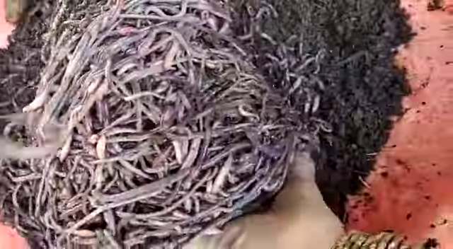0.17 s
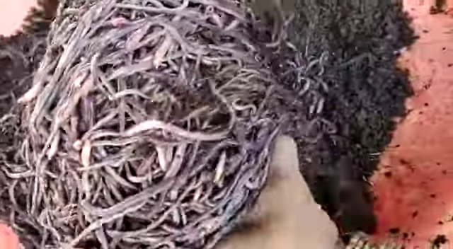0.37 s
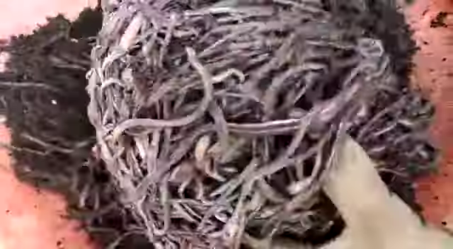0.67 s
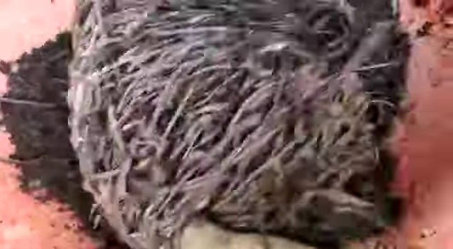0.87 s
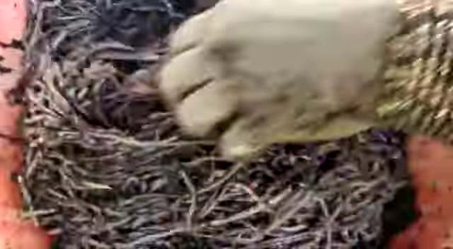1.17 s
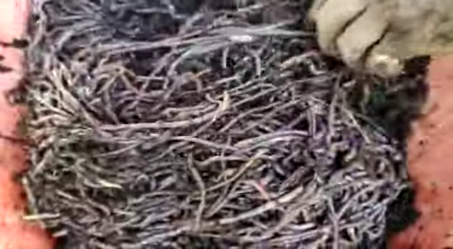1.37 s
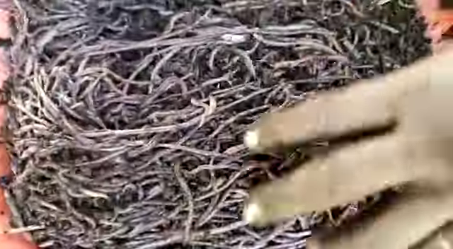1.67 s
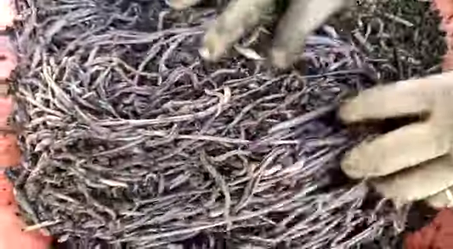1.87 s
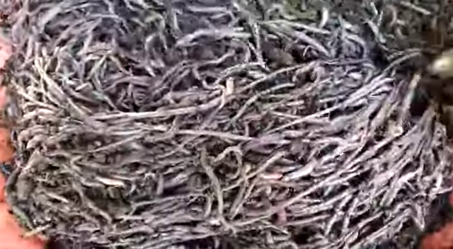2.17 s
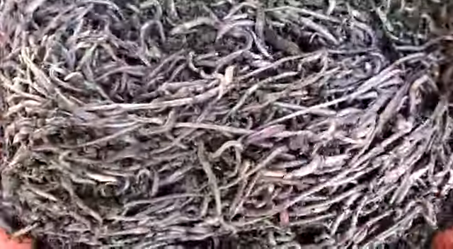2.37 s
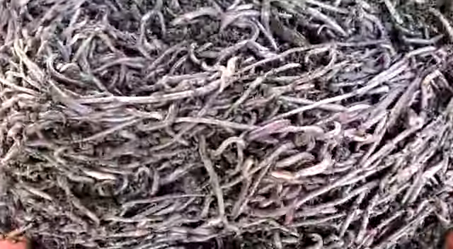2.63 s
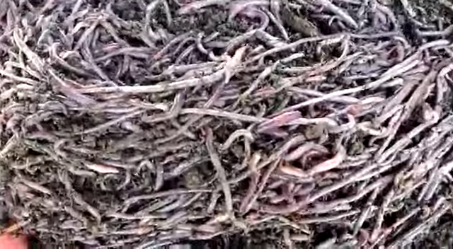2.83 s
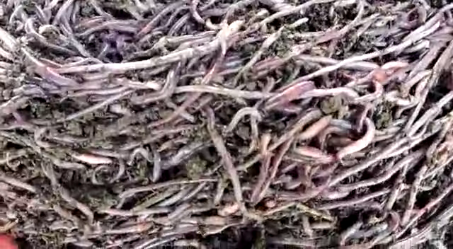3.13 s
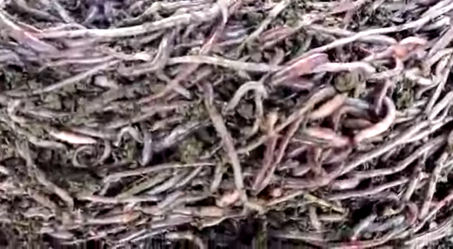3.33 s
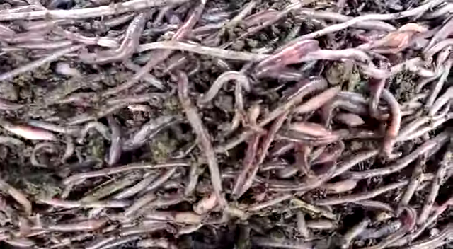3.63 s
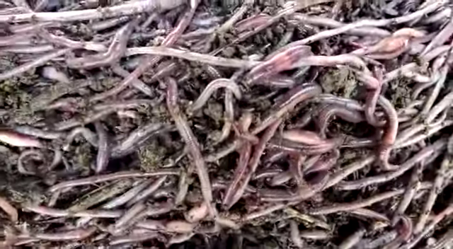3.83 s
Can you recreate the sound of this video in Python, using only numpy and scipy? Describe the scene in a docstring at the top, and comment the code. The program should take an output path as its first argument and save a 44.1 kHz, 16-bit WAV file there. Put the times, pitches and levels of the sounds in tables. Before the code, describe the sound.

Close-miked outdoor handling of earthworms and soil; loud stick-slip rumble with dull knocks first, then much quieter clinking bangles, a soft pat past midway, moist crackles, and faint birds and insects at left.

```python
"""Outdoors, close to the microphone, a hand turns over earthworms and damp soil in a plastic tub.
First a noisy rubbing rumble with damped-sine knocks, which stops abruptly; ringing bangles clink near its end.
Then more clinks, finger brushing and crumb crackle in shaped noise; the clump is patted down past mid-way.
From the trees to the left come gliding-tone trills from the start, then chip-built rasps, slurred whistles
and thin calls of narrow noise, over faint insect whines and a bed of air noise."""
import sys
import numpy as np
from scipy import signal
from scipy.fft import rfft, irfft, next_fast_len
from scipy.io import wavfile
from scipy.ndimage import uniform_filter1d, map_coordinates

SR = 44100
rng = np.random.default_rng(int(sys.argv[2]) if len(sys.argv) > 2 else 0)


def dump_mix(stems):
    """Bounce the given channels to the path in sys.argv[1] as a 16-bit WAV at rate SR."""
    frames = np.atleast_2d(stems).T  # one column per channel
    limited = np.clip(frames, -1, 1)  # hard clip at full scale
    pcm = np.round(limited * 32767).astype(np.int16)
    wavfile.write(sys.argv[1], SR, pcm)


N = 176400

# All levels are relative: each source is trimmed where it is mixed. Left-right/dB is positive to the left.
# close rubbing, course of the rumble: t/s, level/dB
RUMBLE_LEVEL = [(0, -46.5), (.03, -45.5), (.045, -38), (.11, -37), (.128, -43), (.148, -35.5), (.175, -37),
                (.24, -42.5), (.3, -48), (.36, -50.5), (.395, -43.5), (.425, -49.5), (.47, -45),
                (.52, -44.5), (.57, -46), (.605, -40), (.66, -48), (.72, -44), (.765, -40.5), (.79, -45.5),
                (.82, -38.5), (.838, -59), (.87, -45.5), (.9, -34.5)]
# spectrum of the rumble: f/Hz, level/dB
RUMBLE_COLOUR = [(24, -74.5), (40, -41.5), (246, -9), (293, -9.5), (399, -2.5), (732, -4), (870, -8.5),
                 (999, -9), (1710, -26), (2500, -26.5), (3250, -42.5), (5500, -120)]
# hollow resonances that the rubbing excites: f/Hz, width/Hz, level over the broad rumble/dB
HOLLOW_MODES = [(667, 20, 2), (757, 34, 5), (987, 35, 4.5)]
# course of the hiss of the same rubbing: t/s, level/dB
HISS_LEVEL = [(0, -53.5), (.04, -63), (.11, -52.5), (.19, -53), (.23, -51), (.32, -56), (.43, -58.5),
              (.52, -56), (.62, -52.5), (.72, -54), (.8, -58), (.87, -58.5), (.94, -65.5)]
# spectrum of the hiss: f/Hz, level/dB
HISS_COLOUR = [(710, -30), (1200, -1.5), (1710, -7), (2680, -8.5), (3180, -12.5), (4380, -11.5),
               (4830, -16.5), (6730, -5.5), (9990, -17), (15500, -22)]
CRACKLE_RATE, CRACKLE_DB = 36, 3.5  # mean tiny snaps a second in the rubbing, nominal level over its hiss/dB
PORT_LAG_S = 0.00012  # a near sound reaches the right port this much earlier
# soft knocks: t/s, peak level/dB, f/Hz, t60/s
KNOCKS = [(.042, -36, 600, 0.025), (.145, -30, 650, 0.032), (.1808, -22, 760, 0.019),
          (.366, -29.5, 520, 0.0073), (.482, -35.5, 577, .015), (.541, -34.5, 620, 0.026),
          (.729, -34, 480, 0.0042), (.7522, -24.5, 740, 0.0078), (.8, -32.5, 600, 0.044),
          (.811, -26.5, 660, 0.049), (.855, -38, 644, .02), (.878, -20.5, 700, 0.013),
          (.8956, -22, 660, 0.0089), (2.226, -34.5, 280, 0.013), (2.2265, -36.5, 710, 0.019),
          (2.82, -42, 350, 0.0074)]
# snaps of soil crumbs: t/s, level/dB, left-right/dB
CRUMB_SNAPS = [(0.214, -43, -10.5), (0.441, -28, -3), (.696, -21.5, 3.5), (1.529, -34, 0),
               (1.903, -51, -4.5), (2.314, -45.5, 18), (2.672, -47, 16), (2.713, -46.5, 21.5),
               (2.813, -50.5, 12), (2.967, -47, 22)]
# low rustle of soil shifting under the hand: t/s, level/dB
SOIL_LEVEL = [(2.2, -92), (2.235, -64), (2.3, -72), (2.5, -74), (2.7, -68), (2.81, -60), (2.89, -63),
              (3.05, -77), (3.15, -92)]
# spectrum of the shifting soil: f/Hz, level/dB
SOIL_COLOUR = [(50, -27), (140, -7.5), (300, 0.5), (520, -7.5), (700, -15), (900, -9.5), (1200, -24.5),
               (2200, -30.5), (4000, -48.5)]
# fingers brushing through the worms: t/s, level/dB
BRUSH_LEVEL = [(0.93, -62), (1.12, -84.5), (1.3, -62.5), (1.52, -66), (1.7, -76.5), (1.8, -91.5),
               (1.97, -92), (2.01, -76), (2.07, -64.5), (2.19, -67.5), (2.23, -50.5), (2.25, -57.5),
               (2.62, -79.5), (2.84, -64.5), (3.09, -84.5), (3.39, -87.5), (3.7, -79), (4.0, -95)]
# spectrum of the brushing: f/Hz, level/dB
BRUSH_COLOUR = [(400, -44.5), (900, -11), (1600, -1.5), (2150, -3.5), (2900, -9.5), (6000, -23),
                (15000, -41)]
# fine crackle of damp crumbs: t/s, level/dB
FIZZ_LEVEL = [(.9, -65.5), (1.08, -77), (1.25, -69), (1.4, -98), (1.55, -83), (1.95, -69.5), (2.1, -90.5),
              (2.25, -49), (2.45, -76), (2.7, -70.5), (2.85, -81), (3.1, -86), (3.55, -84), (3.68, -80),
              (3.85, -86.5)]
# spectrum of the fine crackle: f/Hz, level/dB
FIZZ_COLOUR = [(1500, -18), (3200, -12), (5000, -3.5), (7000, 2.5), (8500, 0), (10000, -6), (11500, 0.5),
               (14500, -10.5), (16000, -12.5)]
# lumps of soil that scrape past each other: start t/s, length/s, level/dB
LUMPS = [(2.332, 0.047, -58.5), (2.389, 0.041, -66.5), (2.555, 0.026, -69.5), (2.789, 0.0088, -56),
         (2.807, 0.05, -61.5), (2.901, 0.017, -62.5)]
# short scuffs of the fingers: t/s, level/dB
SCUFFS = [(1.233, -60), (1.53, -61), (1.995, -59), (2.063, -57), (2.815, -61)]
# bangle contacts: t/s, peak level/dB, lift of the low modes/dB, left-right/dB, length of the scrape/s
CLINKS = [(0.043, -48.5, 3, -2, 0.0036), (0.106, -48, 0, 0, .006), (0.816, -45.5, 2.5, -7.5, 0.011),
          (0.9, -32.5, 19.5, 2, 0.016), (0.9356, -36.5, 14.5, 3.5, 0.0031), (1.115, -42.5, 5.5, 7, .007),
          (1.1351, -41, 6, 1, 0.0071), (1.451, -40.5, 9, 0, 0.022), (1.658, -40, 8, -3.5, 0.0035),
          (1.67, -39.5, 8, -21.5, 0.0067), (1.687, -34, 10.5, 1, 0.012), (2.146, -48.5, 19, -4, 0.012),
          (2.1937, -35, 11, -3, .003), (2.214, -42.5, 11, 10, 0.0041), (2.236, -36.5, 5, -1, 0.0037),
          (2.247, -29.5, 12, 4.5, 0.008), (2.778, -53, -2, 8, 0.0019), (3.493, -61.5, -1.5, 18.5, 0.01),
          (3.648, -40, 6, 9, 0.014), (3.687, -47.5, -11.5, 10.5, 0.0037)]
# modes of the bangles before detuning: f/Hz, level/dB, t60/s
BANGLE_MODES = [(5820, -16, 0.24), (6200, -10.5, 0.079), (6500, -12, 0.042), (7140, -20, .08),
                (8000, -21, .1), (11030, 3.5, 0.22), (10500, 1, .16), (11540, 6.5, 0.17), (11985, 5, 0.076),
                (13240, 0, .12), (13500, -11, .07), (13000, -7.5, .1)]
# trills in the trees: start t/s, length/s, level/dB
TRILLS = [(0, .66, -64.5), (0.895, 0.14, -62), (1.163, 0.53, -61), (2, 0.41, -60), (2.847, 0.377, -60.5),
          (3.619, .1, -64.5), (3.715, 0.43, -60.5)]
TRILL_HZ, TRILL_FALL_HZ = 4323, 380.4  # centre and nominal fall of each note
TRILL_RATE, TRILL_DUTY = 43, .45  # nominal notes a second, sounding share of each beat
# lower slurred whistle, a lead note, quick drop and sinking tail: t from the drop/s, f/Hz, level/dB
LOW_SONG = [(-.045, 4150, -29), (-.016, 3940, -3), (-.009, 4370, -48), (0, 4170, -7.5), (.007, 4000, 3),
            (.014, 3660, -7), (.02, 3740, -13.5), (.036, 3664, 1), (.046, 3473, -11.5), (.053, 3620, -42)]
# higher slurred whistle of the same form: t from the drop/s, f/Hz, level/dB
HIGH_SONG = [(-.042, 5200, -23), (-.022, 5343, -1), (-.011, 5153, -6.5), (-.006, 6535, -50),
             (-.001, 6140, -21), (.004, 5464, -2), (.008, 4800, -8), (.02, 4610, -2.5), (.03, 4535, 4.5),
             (.037, 4490, -25)]
# faint falling slide of a third bird: t from its start/s, f/Hz, level/dB
SLIDE_SONG = [(0, 6500, -19), (.015, 6260, -3.5), (.04, 5450, 7), (.05, 5170, -5.5)]
# calls of the lower whistler: t/s, level/dB, left-right/dB
LOW_WHISTLES = [(1.434, -60, 10.5), (1.785, -60, 10), (2.123, -61.5, 14), (2.475, -59.5, 10),
                (2.808, -61.5, 18)]
# calls of the higher whistler: t/s, level/dB, left-right/dB
HIGH_WHISTLES = [(1.89, -62.5, -1.5), (2.221, -59, 10), (2.58, -60, 13), (2.914, -67, 15), (3.256, -65, 15)]
# calls of the third bird: t/s, level/dB, left-right/dB
SLIDES = [(1.473, -76, 15), (1.603, -77, 14)]
# harsh falling calls: start t/s, length/s, level/dB
RASPS = [(1.234, 0.16, -62), (3.087, 0.15, -58.5), (3.769, 0.15, -60.5)]
RASP_FROM_HZ, RASP_TO_HZ, RASP_WIDTH_HZ = 4800, 3087, 3000  # glide of the centre, spread of the chips
RASP_CHIPS, CHIP_S, FLUTTER_RATE = 900, 0.011, 32  # chips a second, length of one, swells a second
# thin high buzzes: start t/s, length/s, f/Hz, level/dB
BUZZES = [(.98, 0.054, 5730, -60), (1.98, 0.13, 6750, -59), (2.3, 0.12, 6724, -55.5),
          (2.34, 0.14, 7890, -61.5), (3.3, 0.064, 5550, -64), (3.34, .13, 6020, -76),
          (3.62, 0.24, 6010, -68)]
# faint notes of distant birds: start t/s, length/s, f/Hz, level/dB
FAR_CALLS = [(.9, 0.24, 2350, -78), (1.6, 0.54, 2480, -84.5), (2.35, 0.63, 2586, -80),
             (3.17, 0.2, 2410, -77.5), (3.3, 0.45, 2143, -85), (3.62, 0.4, 1996, -77),
             (3.76, 0.16, 2454, -73.5), (3.89, 0.23, 2700, -68.5)]
# insect whines: start t/s, length/s, f/Hz, level/dB
WHINES = [(.9, 0.71, 8560, -79.5), (1.25, 0.73, 9190, -79.5), (1.95, 0.88, 8700, -79.5),
          (2.88, 0.8, 9300, -80), (3.55, 0.67, 8680, -84.5)]
# spectrum of the open air: f/Hz, level/dB
AIR_COLOUR = [(25, -16), (60, 1), (180, 5), (400, -10), (1000, -9), (2200, -14), (4500, -17), (8000, -8.5),
              (10500, -19), (15000, -37)]
# likeness of the two channels for low, close noise: f/Hz, likeness (0 to 1)
NEAR = [(60, 0.47), (130, 0.98), (290, 0.89), (640, 0.82), (1000, 0.7), (1600, 0.2), (8000, .03)]
# likeness of the two channels for spread-out noise: f/Hz, likeness (0 to 1)
WIDE = [(100, 0.47), (1000, 0.079), (8000, 0.091)]
HUSH_DB, HUSH_FLOOR_DB = -82.5, -10  # noise suppressor: threshold, deepest cut
TOP_HZ = 15800  # band limit


def amp(db):
    """Amplitude factor of a level in dB."""
    return 10 ** (np.asarray(db) / 20)


def unit(x):
    """Scale to an rms of one."""
    return x / np.sqrt(np.mean(x ** 2) + 1e-20)


def along(points, hz):
    """Read (f/Hz, value) points on a log frequency axis."""
    f, v = np.transpose(points)
    return np.interp(np.log(hz + 1), np.log(f + 1), v)


def level(rows):
    """Gain per sample from (t/s, level/dB) rows."""
    return amp(np.interp(np.arange(N) / SR, *np.transpose(rows)))


def wobble(rate, size=N):
    """A smooth random curve, rate knots a second."""
    knots = rng.standard_normal(int(size * rate / SR) + 4)
    return map_coordinates(knots, [np.arange(size) * rate / SR])


def filtered(x, response):
    """Pass x through a response given as a function of f/Hz."""
    m = next_fast_len(x.shape[-1] + 8192)
    spectrum = rfft(x, m) * response(np.fft.rfftfreq(m, 1 / SR))
    return irfft(spectrum, m)[..., :x.shape[-1]]


def coloured(x, points):
    """Shape the spectrum of x by (f/Hz, level/dB) points."""
    return filtered(x, lambda hz: amp(along(points, hz)))


def pan(db):
    """Left and right gains with a mean of one; db is left over right."""
    g = amp(np.array([[db], [-db]]) / 2)
    return g / g.mean()


def add(out, s, x):
    """Mix x into out at time s."""
    i = max(0, round(s * SR))
    part = out[:, i:i + x.shape[-1]]
    part += x[..., :part.shape[-1]]


def swell(t, length, edge):
    """Rise, hold and release."""
    return np.sin(np.pi / 2 * np.clip(np.minimum(t, length - t) / edge, 0, 1))


def rush(colour, alike, grain_db=0, grain_rate=100, patchy_db=0):
    """Stereo noise of rms 1 that comes in grains and patches of uneven strength."""
    grains = rng.standard_normal((2, N)) * amp(grain_db * wobble(grain_rate))
    z = signal.stft(grains, nperseg=1024)[2]
    field = uniform_filter1d(rng.standard_normal(z.shape[1:]), size=11, axis=0)  # across frequency
    field = uniform_filter1d(field, size=7, axis=1)  # along time
    patches = amp(patchy_db * np.minimum(unit(field), 1))
    pair = signal.istft(z * patches, nperseg=1024)[1][:, :N]

    def mid_side(hz):
        turn = np.arccos(np.clip(along(alike, hz), -1, 1)) / 2
        return amp(along(colour, hz)) * [np.cos(turn), np.sin(turn)]

    mid, side = filtered(pair, mid_side)
    return unit(np.array([mid + side, mid - side]))


def tone(hz):
    """A sine that follows a pitch curve."""
    return np.sin(2 * np.pi * np.cumsum(hz) / SR)


def hoarse(hz, width_hz):
    """A narrow noise around a pitch curve."""
    z = wobble(2 * width_hz, len(hz)) + 1j * wobble(2 * width_hz, len(hz))
    return unit(np.real(z * np.exp(2j * np.pi * np.cumsum(hz) / SR)))


def echo(x, t60, delay):
    """Diffuse answer of trees and walls: decaying noise that builds up over the delay."""
    t = np.arange(SR) / SR
    tail = rng.standard_normal((2, SR)) * amp(-60 * t / t60) * (1 - np.exp(-t / delay))
    return signal.fftconvolve(x, unit(tail) / np.sqrt(SR), axes=1)[:, :N]


def from_right(x):
    """The left port of the microphone hears a near sound a little later."""
    ports = np.array([[-1], [1]])
    return filtered(x, lambda hz: np.exp(1j * np.pi * hz * PORT_LAG_S * ports))


def hollow(f):
    """Response of resonances that stand over the broad rumble."""
    response = 1
    for centre, width, db in HOLLOW_MODES:
        response = response + (amp(db) - 1) * 1j * f * width / (centre * centre - f * f + 1j * f * width)
    return response


def crackle():
    """Sparse, tiny snaps of wet crumbs: random hits, each a fast-dying noise burst."""
    strength = amp(np.minimum(4 * rng.standard_normal((2, N)), 6))
    hits = (rng.random(N) < CRACKLE_RATE / SR) * strength
    t = np.arange(SR // 100) / SR
    snap = rng.standard_normal((2, len(t))) * np.exp(-t / 0.00076)
    return amp(CRACKLE_DB) * signal.fftconvolve(hits, snap, axes=1)[:, :N]


def handling():
    """Stick-slip rubbing: a hollow rumble that stops short and a crackling hiss that fades just after."""
    t = np.arange(N) / SR
    rumble = unit(filtered(rush(RUMBLE_COLOUR, NEAR, grain_db=3, grain_rate=220), hollow))
    rumble *= level(RUMBLE_LEVEL) * np.clip((.901 - t) / .004, 0, 1)
    hiss = rush(HISS_COLOUR, WIDE, grain_db=2.0, grain_rate=500, patchy_db=2.5)
    hiss = level(HISS_LEVEL) * unit(hiss + crackle()) * np.clip((.95 - t) / 0.044, 0, 1)
    return amp(-2.5) * from_right(rumble) + amp(2.5) * hiss


def knocks():
    """Dull, quickly damped bumps: two sines with a soft onset."""
    out, t = np.zeros((2, N)), np.arange(SR // 10) / SR
    for s, db, hz, t60 in KNOCKS:
        ring = np.sin(2 * np.pi * hz * t) + amp(-6.5) * np.sin(2 * np.pi * hz * 1.4 * t)
        ring = ring * amp(-60 * t / t60) * (1 - np.exp(-t / 0.00091)) ** 2
        add(out, s, amp(db) * ring / np.abs(ring).max())
    return coloured(out, [(30, -28.0), (160, -1.5)]) * pan(-1.2)


def soil():
    """Damp soil shifts, fingers brush the worms and crumbs snap: noise bursts over grainy noise."""
    out, t = np.zeros((2, N)), np.arange(SR // 20) / SR
    for s, db, side_db in CRUMB_SNAPS:
        snap = rng.standard_normal((2, len(t))) * amp(-60 * t / 0.0032)
        add(out, s, amp(db - 8.5) * pan(side_db) * snap)
    out = coloured(out, [(500, -34), (1500, -5), (7000, 8.5), (15000, -1.5)])
    shifting = rush(SOIL_COLOUR, NEAR, grain_db=3.5, grain_rate=90, patchy_db=4)
    out += amp(-1) * level(SOIL_LEVEL) * shifting
    brushing = rush(BRUSH_COLOUR, WIDE, grain_db=3, grain_rate=150, patchy_db=6)
    out += amp(-2.5) * level(BRUSH_LEVEL) * brushing * pan(9.4)
    fizz = rush(FIZZ_COLOUR, WIDE, grain_db=2.5, grain_rate=600, patchy_db=9.0)
    return out + amp(0.5) * level(FIZZ_LEVEL) * fizz * pan(3)


def lumps():
    """Short, low scrapes of soil against soil."""
    t = np.arange(N) / SR
    strength = sum(amp(db) * swell(t - s, length, length / 2) for s, length, db in LUMPS)
    return strength * rush(SOIL_COLOUR, NEAR, grain_db=0.5, grain_rate=300)


def scuffs():
    """A finger catches in the clump: a brief, dull rasp that starts at once and dies away."""
    t = np.arange(N) / SR
    strength = sum(amp(db) * (t >= s) * np.exp(-np.abs(t - s) / 0.006) for s, db in SCUFFS)
    return strength * rush(BRUSH_COLOUR, WIDE, grain_db=2, grain_rate=200) * pan(2.4)


def bangle_ring(t, low_db):
    """Decaying modes of four slightly unlike rings, with random phases in each channel."""
    ring = 0
    for hz, mode_db, t60 in BANGLE_MODES:
        fade = amp(mode_db + low_db * (hz < 9000) - 60 * t / t60)
        for detune in rng.standard_normal(size=4):
            cycles = hz * (1 + 0.0063 * detune) * t + rng.random((2, 1))
            ring = ring + fade * np.sin(2 * np.pi * cycles)
    return ring


def bangles():
    """Rings on the wrist scrape and chatter; each contact excites their high modes."""
    out, t = np.zeros((2, N)), np.arange(SR // 5) / SR
    for s, db, low_db, side_db, scrape in CLINKS:
        ring = bangle_ring(t, low_db)
        burst = rng.standard_normal((2, len(t))) * np.exp(-t / .0018)
        crack = coloured(burst, [(1500, -72), (3000, -40.5), (5500, 0.5)])
        ring = ring * (amp(-14) + np.exp(-t / 0.005)) + amp(5.5) * crack
        contacts = rng.standard_normal(len(t)) * amp(2 * wobble(900, len(t)))
        contacts *= (t / scrape) ** 0.33 * np.exp(-(t / scrape) ** 3)
        clink = signal.fftconvolve(ring, contacts[None], axes=1)[:, :len(t)]
        clink /= np.abs(clink).max(axis=1, keepdims=True)
        add(out, s, amp(db + 3.0) * pan(side_db) * clink)
    out = coloured(out, [(1500, -29), (4500, 0)])
    return out + amp(-22.5) * echo(out, t60=0.49, delay=.01)


def trills():
    """A fast run of tiny falling notes with gaps between, blurred by nearby leaves."""
    out = np.zeros((2, N))
    for s, length, db in TRILLS:
        t = np.arange(int(length * SR)) / SR
        beat = (TRILL_RATE * t + 0.095 * wobble(20, len(t))) % 1
        note = np.minimum(beat / TRILL_DUTY, 1)  # 0 to 1 through each note, then silent
        hz = TRILL_HZ + TRILL_FALL_HZ * (.5 - note) + 90 * wobble(200, len(t))
        run = unit(tone(hz) * np.sin(np.pi * note) ** 2)
        add(out, s, amp(db - 4.5 + wobble(40, len(t))) * swell(t, length, 0.05) * run)
    leaves = amp(-7) * echo(out, t60=.06, delay=.004)
    return (out + leaves) * pan(17)


def whistles(song, calls):
    """One bird repeats its gliding whistle, never quite alike in pitch and strength."""
    out = np.zeros((2, N))
    at, hz, shape_db = np.transpose(song)
    t = np.arange(at[0], at[-1], 1 / SR)
    for s, db, side_db in calls:
        drift = 1 + .008 * wobble(30, len(t)) + .008 * wobble(500, len(t))
        pitch = np.interp(t, at, hz) * drift
        flutter_db = 2 * wobble(180, len(t))
        gain = amp(db + 6.0 + flutter_db + np.interp(t, at, shape_db))
        add(out, s + at[0], gain * tone(pitch) * pan(side_db))
    return out


def rasps():
    """A harsh scold: a fluttering shower of short tonal chips that swells, fades and slides down."""
    out, t = np.zeros((2, N)), np.arange(int(CHIP_S * SR)) / SR
    for s, length, db in RASPS:
        for u in np.linspace(0, 1, int(RASP_CHIPS * length)):
            hz = RASP_FROM_HZ + (RASP_TO_HZ - RASP_FROM_HZ) * u + RASP_WIDTH_HZ * (rng.random() - .5)
            flutter_db = 3 * np.cos(2 * np.pi * FLUTTER_RATE * u * length)
            size_db = db - 3.5 + 3 * rng.standard_normal() + flutter_db
            cycles = hz * t * (1 - 1.9 * t) + rng.random()  # each chip sinks slightly
            chip = np.sin(2 * np.pi * cycles) * np.sin(np.pi * t / CHIP_S) ** 2
            add(out, s + u * length, amp(size_db) * np.sin(np.pi * u) * chip)
    return filtered(out, lambda hz: (hz > 2400) & (hz < 5600)) * pan(16.6)


def thin_calls(calls, width_hz, edge, side_db):
    """Buzzing notes at a steady pitch: narrow noise with soft edges."""
    out = np.zeros((2, N))
    for s, length, hz, db in calls:
        t = np.arange(int(length * SR)) / SR
        add(out, s, amp(db) * swell(t, length, edge) * hoarse(np.full(len(t), hz), width_hz))
    return out * pan(side_db)


def insects():
    """Thin whines: very narrow noise that fades in and out slowly."""
    return thin_calls(WHINES, width_hz=180, edge=0.13, side_db=15.5)


def open_air():
    """The bed of outdoor air: faint, wide, patchy noise."""
    return amp(-82.5) * rush(AIR_COLOUR, WIDE, patchy_db=7.0) * pan(2.5)


def scene():
    """Close hand, soil and bangles, then birds with their echo from the trees, insects and air."""
    close = handling() + from_right(knocks()) + soil() + lumps() + scuffs() + bangles()
    birds = trills() + whistles(LOW_SONG, LOW_WHISTLES)
    birds += whistles(HIGH_SONG, HIGH_WHISTLES) + whistles(SLIDE_SONG, SLIDES)
    far = rasps() + thin_calls(BUZZES, width_hz=520, edge=0.042, side_db=17.5)
    far += thin_calls(FAR_CALLS, width_hz=170, edge=0.072, side_db=17.5)
    trees = amp(-3.0) * echo(birds, t60=0.47, delay=0.003) + amp(-3) * echo(far, t60=0.41, delay=0.005)
    return close + birds + amp(-2.5) * far + trees + insects() + open_air()


def record(dry):
    """A noise suppressor ducks whatever is faint, band by band; nothing is kept above the band limit."""
    z = signal.stft(dry, nperseg=1024)[2]
    power = np.mean(np.abs(z) ** 2, axis=0)
    power = uniform_filter1d(uniform_filter1d(power, size=7, axis=0), size=5, axis=1)
    power = np.abs(power) * len(power)  # scaled by the number of bands
    keep = power ** 2 / (power ** 2 + amp(HUSH_DB) ** 4)
    hushed = signal.istft(z * np.maximum(keep, amp(HUSH_FLOOR_DB)), nperseg=1024)[1][:, :N]
    return filtered(hushed, lambda hz: hz < TOP_HZ)


dry = scene()
out = record(dry)
dump_mix(out)
```